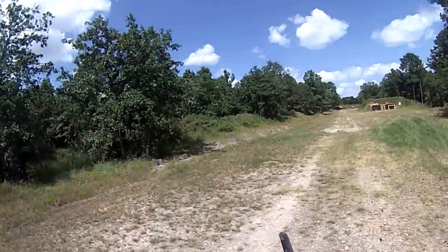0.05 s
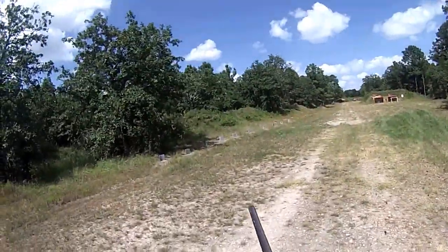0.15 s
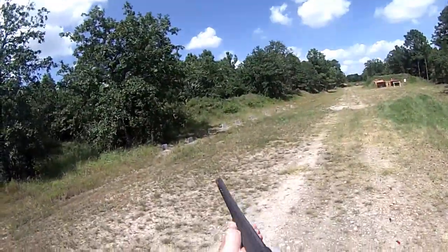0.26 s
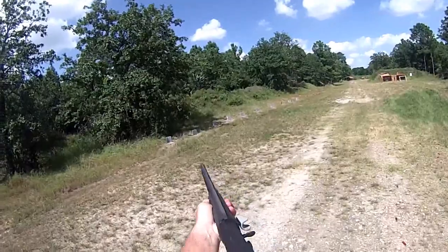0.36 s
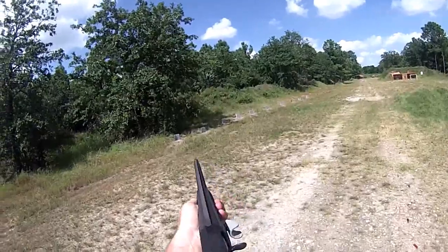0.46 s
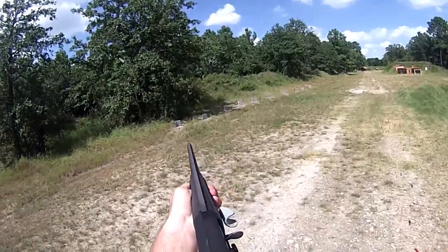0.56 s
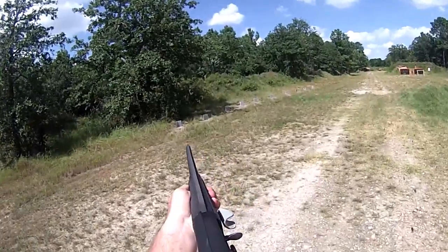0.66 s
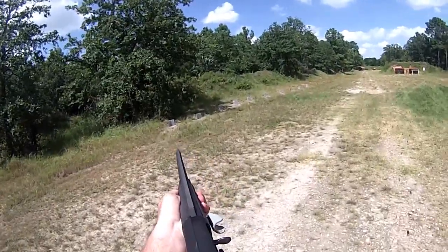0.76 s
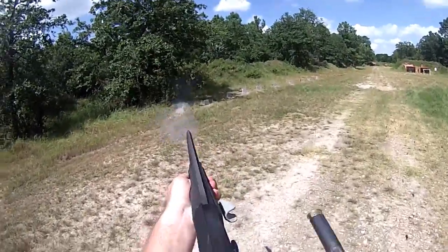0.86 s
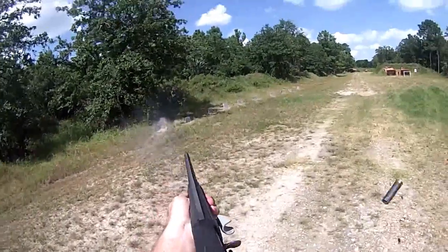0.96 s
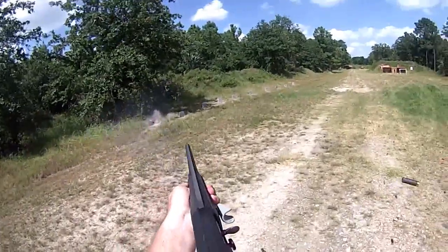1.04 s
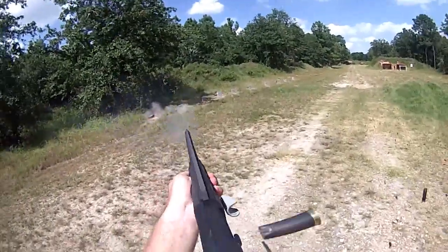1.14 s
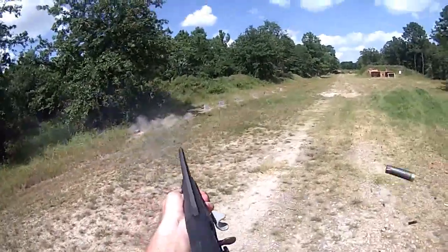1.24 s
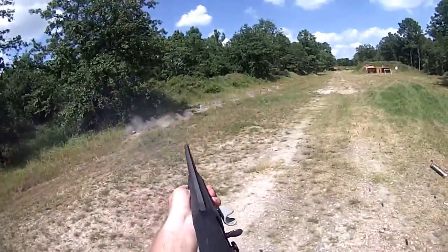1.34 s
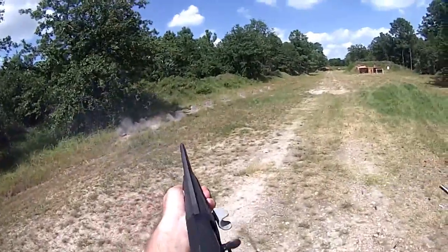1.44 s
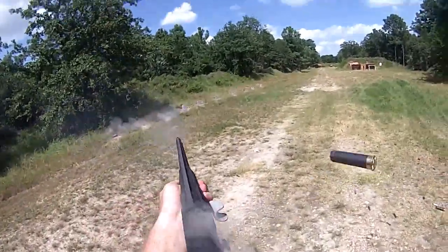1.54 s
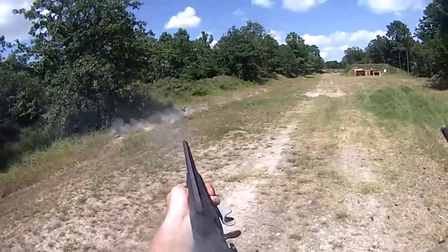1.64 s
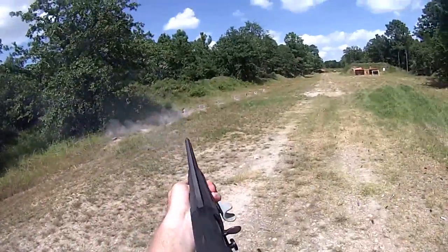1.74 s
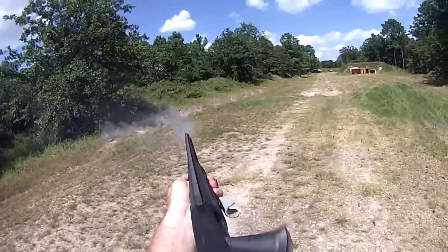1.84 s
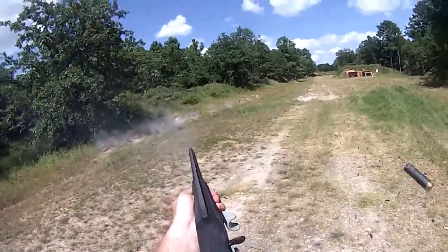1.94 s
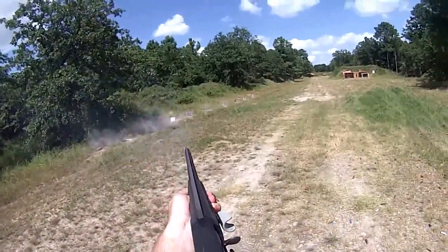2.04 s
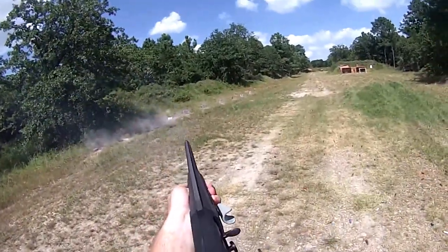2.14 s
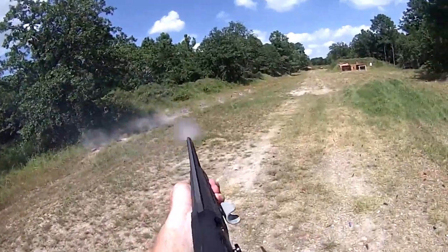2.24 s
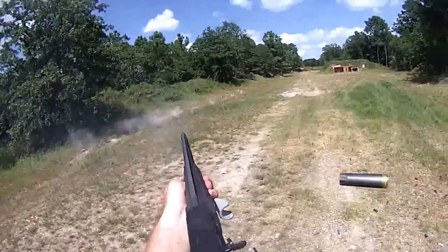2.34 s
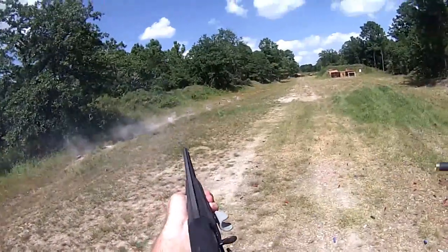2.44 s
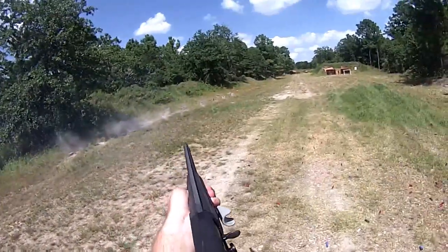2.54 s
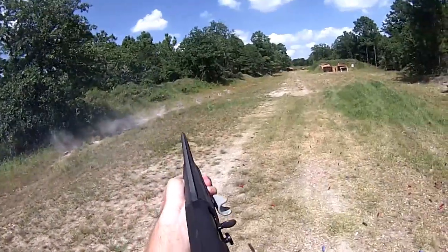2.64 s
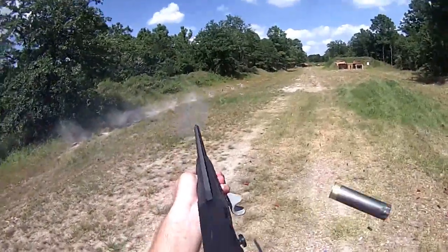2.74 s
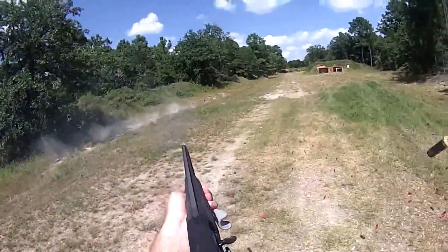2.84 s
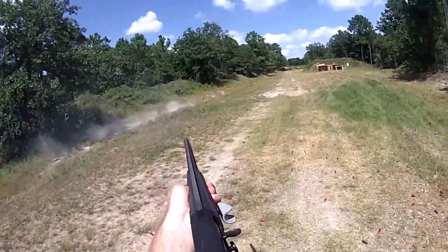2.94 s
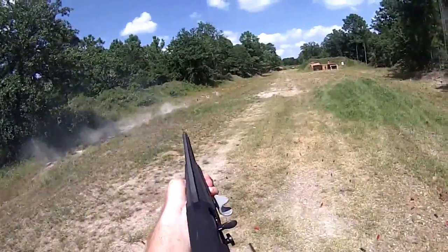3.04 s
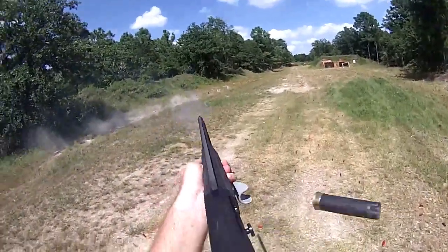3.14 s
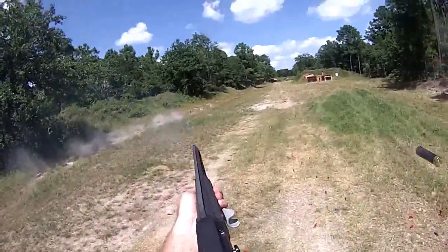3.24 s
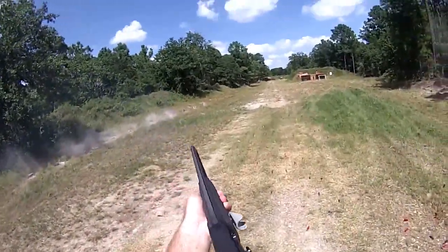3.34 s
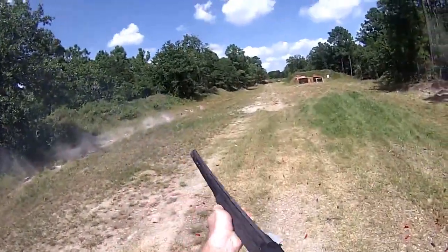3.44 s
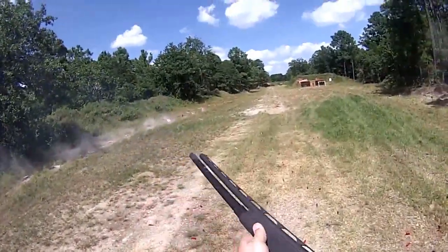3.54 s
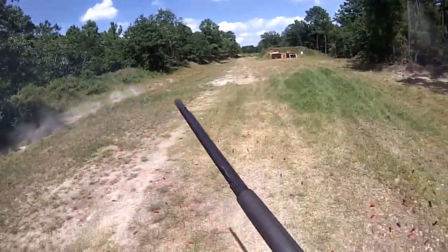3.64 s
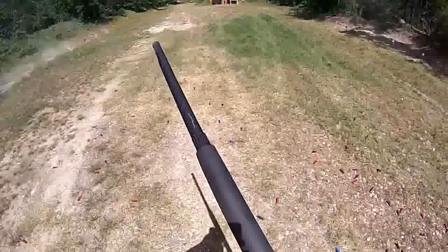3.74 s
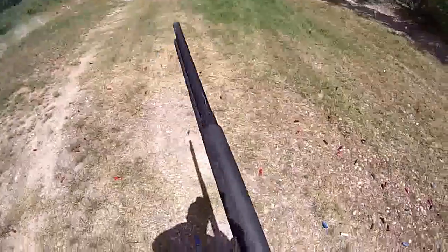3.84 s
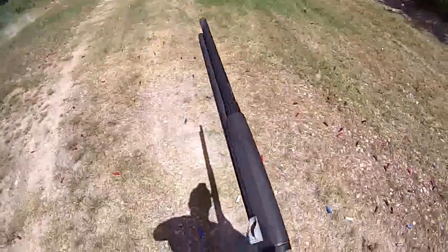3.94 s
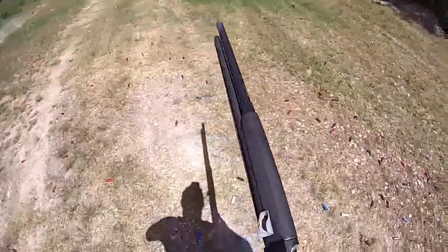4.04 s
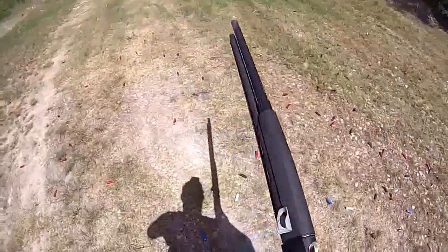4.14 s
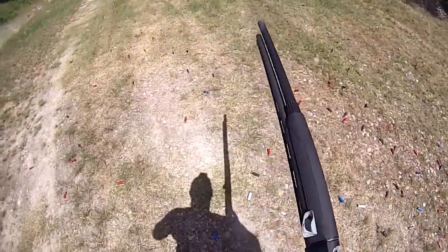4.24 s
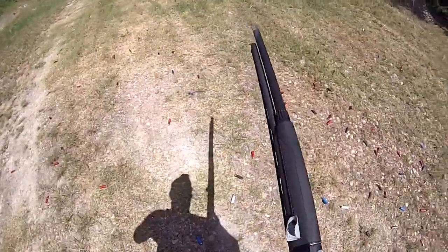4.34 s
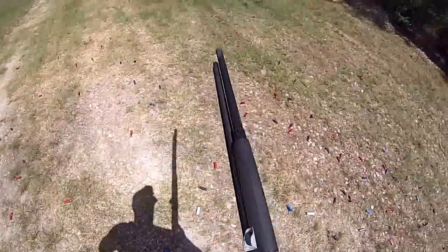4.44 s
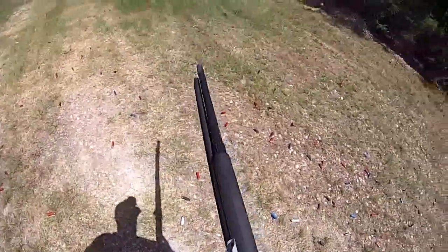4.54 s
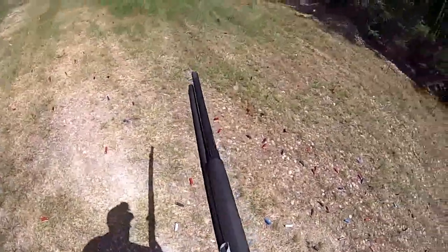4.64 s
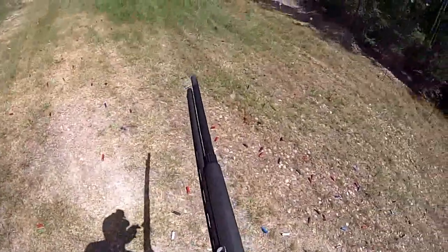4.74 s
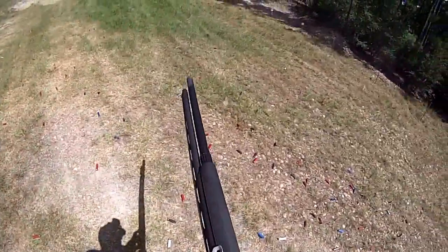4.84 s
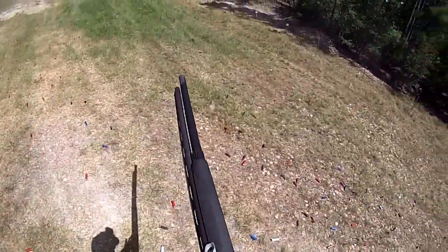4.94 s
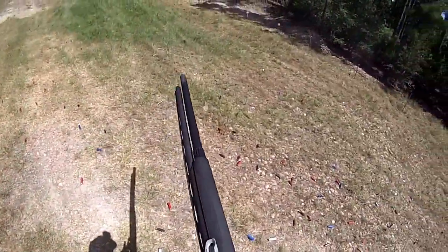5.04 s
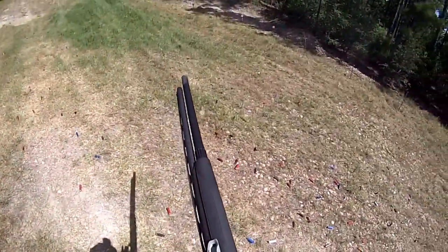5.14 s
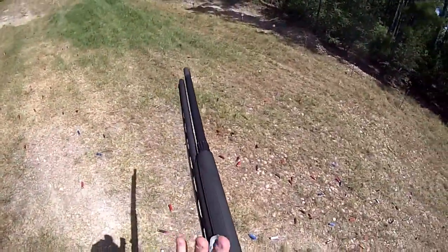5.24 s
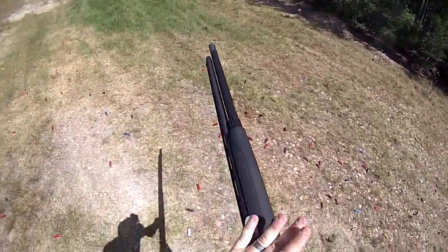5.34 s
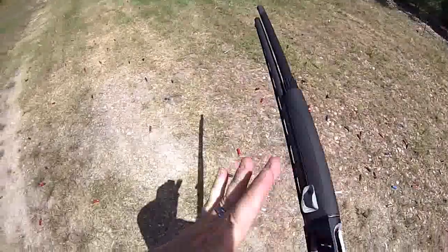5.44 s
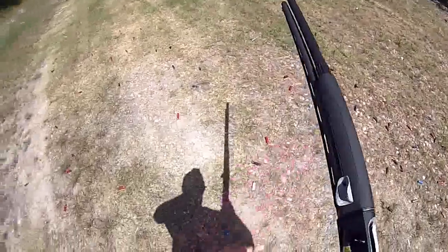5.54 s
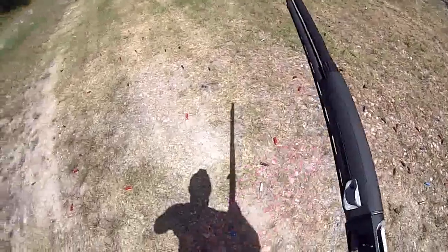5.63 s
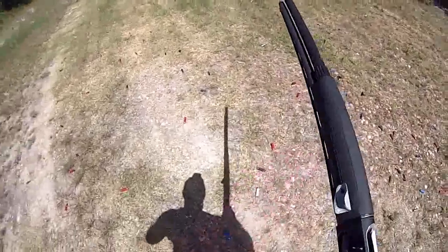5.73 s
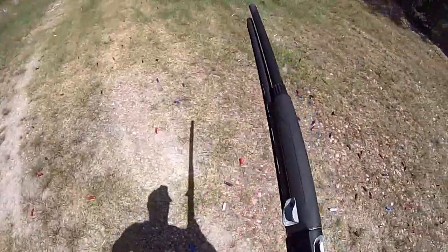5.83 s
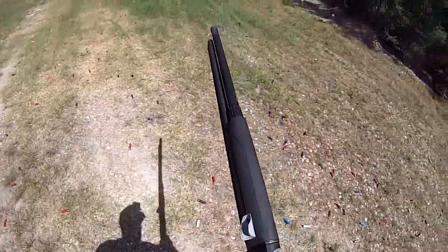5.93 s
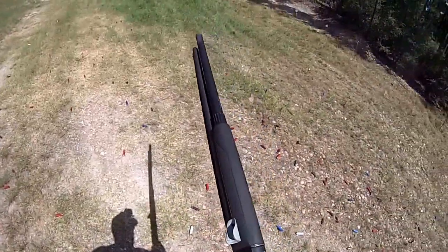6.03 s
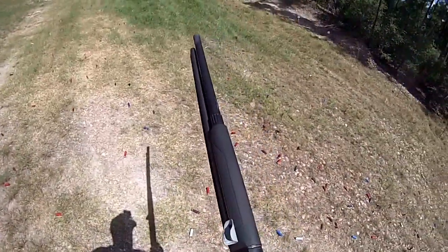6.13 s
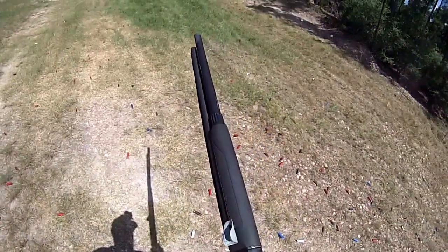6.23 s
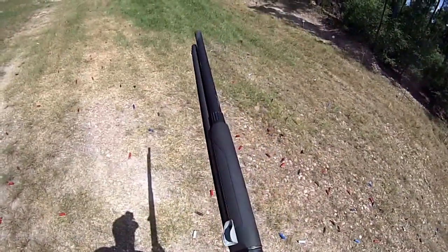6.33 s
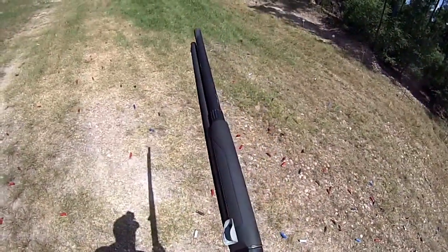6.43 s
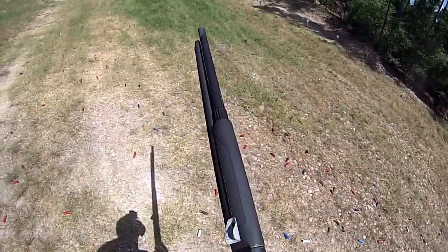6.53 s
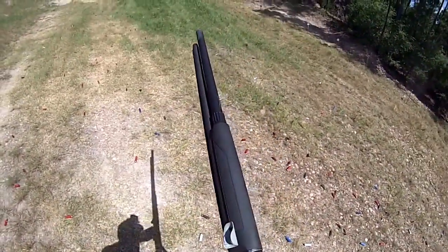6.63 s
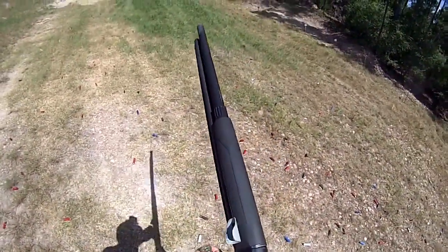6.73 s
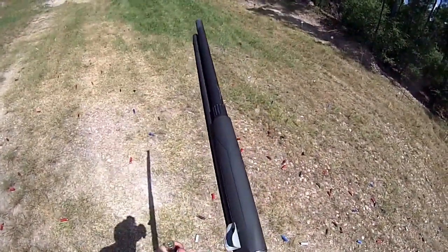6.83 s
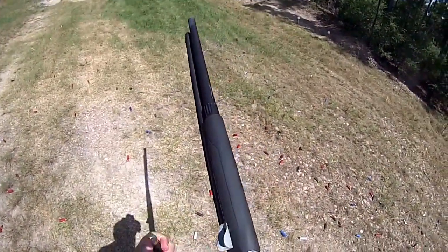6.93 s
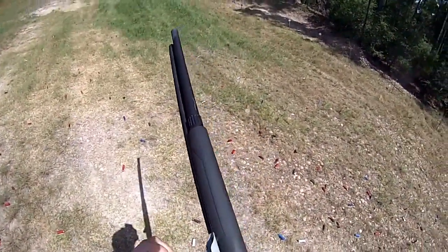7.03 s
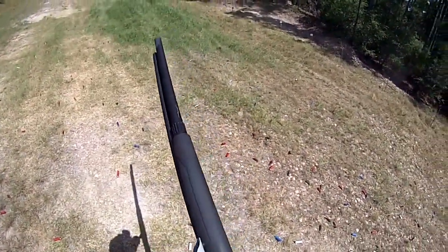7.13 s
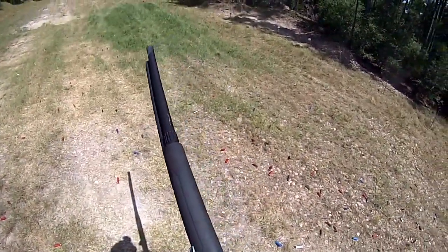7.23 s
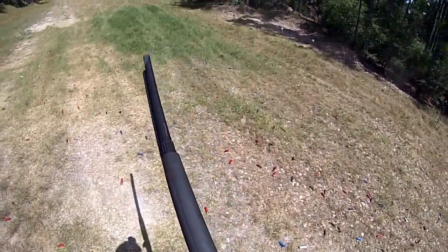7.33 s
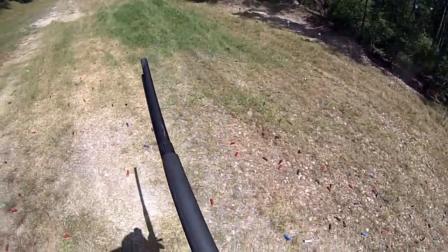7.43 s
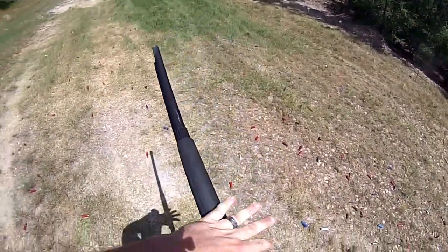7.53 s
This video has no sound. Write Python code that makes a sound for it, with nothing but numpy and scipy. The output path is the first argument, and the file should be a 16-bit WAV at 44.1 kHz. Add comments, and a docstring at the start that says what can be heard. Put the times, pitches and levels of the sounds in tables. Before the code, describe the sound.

A shotgun fires seven quick, loud shots outdoors with rolling echoes, then shells click and scrape as it is reloaded in light wind.

```python
"""A self-loading shotgun fires seven quick shots on an outdoor range, heard from the shooter's camera.
Each blast of shock and hot gas overloads the microphone, rocks the camera, cycles the steel bolt and
rolls back from the tree line. Then the gun is lowered and reloaded: shells click against the port and
scrape into the magazine. A light breeze runs underneath, buffeting harder when the shooter moves."""
import sys
import numpy as np
from scipy import signal
from scipy.fft import rfft, irfft, next_fast_len
from scipy.io import wavfile
from scipy.ndimage import uniform_filter1d, minimum_filter1d, map_coordinates

SR = 44100
rng = np.random.default_rng(int(sys.argv[2]) if len(sys.argv) > 2 else 0)


def persist_wave(psi):
    """Save psi, clipped to +-1, as 16-bit WAV."""
    counts = np.round(np.clip(psi, -1, 1) * 32767).astype(np.int16)
    wavfile.write(sys.argv[1], SR, np.atleast_2d(counts).T)


N = 334278


def amp(db):
    """Decibels to gain."""
    return 10 ** (np.asarray(db) / 20)


def unit(x):
    """x at rms 1."""
    return x / np.sqrt(np.mean(x ** 2) + 1e-20)


def clock(seconds):
    """Sample times of a sound of this length."""
    return np.arange(int(seconds * SR)) / SR


def along(points, hz):
    """Read a curve of (frequency [Hz], value) points on a log frequency axis."""
    freqs, values = np.transpose(points)
    return np.interp(np.log(hz + 1), np.log(freqs + 1), values)


def add(track, s, sound):
    """Mix a sound into the track at s seconds."""
    part = track[max(round(s * SR), 0):][:len(sound)]
    part += sound[:len(part)]


def filtered(x, response):
    """x through a filter, given as a complex response of frequency."""
    size = next_fast_len(len(x) + 8192)
    return irfft(rfft(x, size) * response(np.fft.rfftfreq(size, 1 / SR)), size)[:len(x)]


def lowpass(x, cutoff_hz):
    """A gentle one-pole roll-off."""
    return filtered(x, lambda hz: 1 / (1 + 1j * hz / cutoff_hz))


def resonances(modes, hz, polarity=-1):
    """Response of a resonator bank, signs alternating; polarity 1 leaves notches between the peaks."""
    return sum(polarity ** k * amp(db) * 1j * hz * width / (centre ** 2 - hz ** 2 + 1j * hz * width)
               for k, (centre, width, db) in enumerate(modes))


def noise(spectrum, t):
    """Coloured noise of rms 1 over the times t."""
    return unit(filtered(rng.standard_normal(len(t)), lambda hz: amp(along(spectrum, hz))))


def wobble(rate, t):
    """Smooth random modulation, rate knots a second."""
    return map_coordinates(rng.standard_normal(int(t[-1] * rate) + 2), [t * rate], mode="nearest")


def envelope(t, attack, t60, hold=0):
    """A quick attack, an optional hold and an exponential decay, all in seconds."""
    return (1 - np.exp(-t / attack)) * np.exp(-np.log(1000) * np.maximum(t - hold, 0) / t60)


# Soft bed of outdoor air: (frequency [Hz], level [dB])
AIR_SPECTRUM = [(90, 1.5), (200, -7), (400, -10), (1200, -16.5), (3000, -22.5), (7000, -31.5), (13500, -40),
                (16000, -49)]
# Wind rumble on the microphone: (frequency [Hz], level [dB])
BUFFET_SPECTRUM = [(8.8, -36), (15, -2.5), (32, 2), (50, -2.5), (63, -5.5), (97, -32), (160, -38),
                   (210, -69.5), (350, -120)]
# Wind swells as the gun is raised, fired, lowered and reloaded: (time [s], level [dB], half width [s])
BUFFET_SWELLS = [(.05, -45.5, 0.15), (.53, -29.5, 0.103), (1.05, -34.5, 0.19), (1.85, -35, 0.29),
                 (2.9, -36, 0.31), (3.62, -34.5, 0.18), (5.45, -43, .15), (6.83, -38, 0.041)]
def breeze(buffet_db=3, air_db=-54):
    """Wind buffets the microphone, more when the shooter moves, over a soft, even rush."""
    t = np.arange(N) / SR
    swells = sum(amp(db) * np.exp(-((t - s) / width) ** 2) for s, db, width in BUFFET_SWELLS)
    flow = amp(-52.5) + swells  # some wind remains when the shooter stands still
    buffet = flow * amp(buffet_db + 2.4 * wobble(6.2, t)) * noise(BUFFET_SPECTRUM, t)
    air = amp(air_db + 0.18 * wobble(9, t)) * noise(AIR_SPECTRUM, t)
    return buffet + air


# Low thumps of body movement: (time [s], level [dB])
BODY_BUMPS = [(0.487, -16), (5.369, -18), (6.722, -26), (6.801, -35), (7.513, -30.5)]
def camera_jolts(recoil_db=-5, recoil_hz=35, bump_db=4, bump_hz=40):
    """Recoil and body movements rock the camera on its mount: a few slow swings of pressure."""
    out, t = np.zeros(N), clock(0.5)
    for s, *_ in SHOTS:
        swing = np.sin(2 * np.pi * recoil_hz * t + 0.25 * wobble(35, t))
        add(out, s + 0.001, amp(recoil_db) * swing * envelope(t, 0.0088, 0.39))
    for s, db in BODY_BUMPS:
        swing = np.sin(2 * np.pi * bump_hz * t + 0.5 * wobble(50, t))
        add(out, s, amp(db + bump_db) * swing * envelope(t, 0.0085, 0.32))
    return out


# Metallic colour of the receiver, for scrapes and clicks: (frequency [Hz], width [Hz], level [dB])
RECEIVER_MODES = [(1450, 180, 2.5), (2265, 260, 3), (2964, 157, 5.5), (3480, 102, 5), (3960, 270, 2.5),
                  (4930, 190, -5.5), (5620, 440, -7.5), (8760, 1110, -12.5), (12100, 1000, -27.5)]
# Shells sliding into the magazine: (time [s], length [s], start level [dB], end level [dB])
SHELL_SLIDES = [(5.357, 0.064, -31, -30.5), (6.719, 0.037, -37.5, -26), (6.776, 0.017, -13, -18),
                (6.831, 0.033, -36, -40.5), (7.441, 0.15, -51, -26.5)]
def shell_scrapes(slide_db=-8, grain_db=3.5, chatter_db=3, bright_hz=5000):
    """Each shell sticks and slips along the port as it is pushed in."""
    out, t = np.zeros(N), clock(0.4)
    for s, length, start_db, end_db in SHELL_SLIDES:
        slips = rng.standard_normal(len(t))
        slips *= amp(grain_db * wobble(456.4, t) + chatter_db * wobble(158, t))
        scrape = unit(filtered(slips, lambda hz: resonances(RECEIVER_MODES, hz) * (1 + hz / bright_hz)))
        push = amp(slide_db + np.interp(t, [0, length], [start_db, end_db]))
        add(out, s, scrape * push * envelope(t, 0.00067, 0.084, hold=length))
    return out


# Short ring of the magazine tube: (frequency [Hz], level [dB], t60 [s])
TUBE_MODES = [(2277, -10, .04), (2896, -7, .04), (3650, -8, .03), (4100, -5, .035), (4350, 0, .05)]
# Shells and fingers hitting the loading port:
# (time [s], level [dB], knock [dB], ring [dB], tilt [dB/octave], favoured frequency [Hz])
PORT_HITS = [(3.8586, -33, -21, -15, 6, 1450), (4.8927, -23.5, -22, -20, 0, 2360),
             (4.946, -39.5, -12, -31, 11, 1190), (5.0739, -39.5, -12, -18, -3, 4130),
             (5.1001, -16.5, -28, -7, -1.5, 3900), (5.1607, -34, -32, -1.5, 1.5, 4130),
             (5.2086, -41.5, -22, -18, -1, 2220), (5.3576, -8.5, -21, -20, 5, 4160),
             (5.412, -15, -3.5, -17.5, 5, 1450), (5.9668, -45.5, -8, -27, -7.5, 1535),
             (6.1552, -37, -2, -31, -4.5, 1210), (6.6926, -37, -17, -27, 6, 1490),
             (6.7305, -18, -16, -18, 6, 5660), (6.7673, -15.5, -12, -14, 1, 4100),
             (6.7743, -4, -19, -37, 5.5, 1980), (7.2914, -20.5, -16.5, -27, 6.5, 2720),
             (7.3097, -30, -14, -22, 3, 1657), (7.426, -30, -25, -27, 3, 4100),
             (7.5015, -20.5, -11, -34, 10, 3670), (7.524, -18, -15, -25, -0.5, 3450),
             (7.5695, -9, -28, -35, 4.5, 3370)]
def loading_clicks(snap_db=-4, knock_db=-8, crack_db=-26, rebound_s=0.011, rebound_db=-15):
    """Shells tap the port with a dry crack and a dull knock, rebound and ring the magazine tube."""
    out, t = np.zeros(N), clock(0.19)
    knock_spectrum = [(200, -15), (620, 5.5), (1350, 13), (2200, -50), (6000, -60)]
    for s, db, dull_db, ring_db, tilt_db, spot_hz in PORT_HITS:
        def colour(hz):
            """The receiver's tone, with one resonance favoured by the spot that is struck."""
            spot = 1.5 + resonances([(spot_hz, 450, 7)], hz)
            tilt = amp(tilt_db * np.log2((hz + 500) / 4500))
            return resonances(RECEIVER_MODES, hz) * spot * tilt

        for delay, loss_db in [(0, 0), (rebound_s, rebound_db)]:
            contact = rng.standard_normal(len(t)) * envelope(t, 0.0003, 0.025)
            snap = amp(snap_db) * filtered(contact, colour)
            knock = amp(knock_db + dull_db) * noise(knock_spectrum, t) * envelope(t, 0.0033, 0.061)
            ring = sum(amp(mode_db + rng.normal(0, 4.4)) * np.sin(2 * np.pi * hz * t)
                       * envelope(t, 0.00013, t60) for hz, mode_db, t60 in TUBE_MODES)
            click = snap + amp(crack_db) * contact + knock + amp(ring_db) * ring
            add(out, s + delay, amp(db + loss_db) * click)
    return out


# Reverb time of the woods: (frequency [Hz], t60 [s])
WOODS_DECAY = [(200, 1.8), (700, 1.4), (1600, 1.5), (3500, 1.1), (5500, 0.87), (12000, 0.27)]
def woods_tail(woods):
    """Shape noise into the roll of distant woods: it comes in clumps, the treble dying first."""
    hz, age, bands = signal.stft(woods, SR, nperseg=256)
    clumps = uniform_filter1d(rng.standard_normal(bands.shape), size=11, axis=0)  # across frequency
    clumps = unit(uniform_filter1d(clumps, size=2, axis=1))  # across time
    clump_db = clumps * along([(1500, 4), (5000, 1.2)], hz)[:, None]
    decay_db = -60 * (age - 0.25) / along(WOODS_DECAY, hz)[:, None]
    return signal.istft(bands * amp(decay_db + clump_db), SR, nperseg=256)[1][:len(woods)]


# Bright scatter from the ground and the nearest trees: (frequency [Hz], level [dB])
NEAR_SPECTRUM = [(110, -34.5), (180, -10), (293, -16), (888, -9.5), (1500, -2.5), (2030, -7.5), (2230, -2),
                 (2450, -8.5), (3560, -1), (5280, -13), (5800, -14), (7690, -16.5), (11400, -23),
                 (14800, -33.5), (16000, -52.5)]
# Darker wash from the woods behind: (frequency [Hz], level [dB])
WOODS_SPECTRUM = [(120, -46.5), (200, -7.5), (422, -15.5), (694, -1), (1230, -5.5), (1520, 1.5), (2050, -4),
                  (2240, -1), (2500, -13), (2830, -3), (3630, -4.5), (5270, -18.5), (5760, -18),
                  (6500, -14.5), (7100, -23), (8980, -24), (14000, -45.5)]
# Slapbacks from the edges of the range: (delay [s], level [dB], t60 [s])
SLAPBACKS = [(.178, -15, 0.037), (.213, -24.5, .05), (.275, -33.5, .06), (.88, -49.5, .25),
             (1.083, -46.5, .05)]
def range_echoes(near_db=-19.5, far_db=-29, patchy_db=2, ground_s=0.0026, trees_s=0.046, build_s=0.27):
    """Ground and nearby trees throw back a bright rush, the edges slap back and the woods roll on."""
    out, t = np.zeros(N), clock(2.2)
    trunks = amp(patchy_db * wobble(130, t))  # the same trees answer every shot
    ground = amp(2) * envelope(np.maximum(t - ground_s, 0), 0.0014, 0.24)
    trees = amp(-5.5) * envelope(np.maximum(t - trees_s, 0), 0.0042, 0.33, hold=0.078)
    build_up = 1 - np.exp(-(t / build_s) ** 2)
    for s, *_ in SHOTS:
        near = amp(near_db) * noise(NEAR_SPECTRUM, t) * np.hypot(ground, trees) * trunks
        woods = noise(WOODS_SPECTRUM, t)
        far = amp(far_db) * woods_tail(woods) * build_up
        add(out, s, near + far)
        for delay, db, t60 in SLAPBACKS:
            add(out, s + delay, amp(db) * woods * envelope(t, 0.002, t60))
    return out


# Steel-on-steel clack: (frequency [Hz], level [dB])
CLACK_SPECTRUM = [(180, -33), (300, -3.5), (528, -9), (961, -14.5), (1510, -8), (2610, -11), (3580, 0),
                  (4990, -15), (5800, -10), (6960, -15), (11300, -19.5), (14200, -29.5), (16000, -46.5)]
# High ring of the bolt: (frequency [Hz], level [dB], t60 [s])
BOLT_MODES = [(6950, -2, .16), (10000, 1, .15)]
# Ping of the ejected hull: (frequency [Hz], level [dB], t60 [s])
HULL_MODES = [(4231, 0, .21), (4950, -14, .17)]
# The bolt slamming home on a fresh shell: (time [s], level [dB])
BOLT_SLAMS = [(0.989, -23), (1.294, -26), (1.648, -26), (2.007, -26), (2.4342, -24.5), (2.871, -24.5)]
# Light ticks of the trigger: (time [s], level [dB])
TRIGGER_TICKS = [(2.265, -29), (2.9946, -29.5), (3.448, -40)]
def gun_action(bolt_db=12, ring_db=15, ring_rise_s=0.037, unlock_s=0.0263, eject_s=0.016,
               low_cut_hz=450, body_hz=1510, body_db=-11):
    """The bolt unlocks, hits its stop, ejects a ringing hull and, on all but the last shot, slams home."""
    out, t = np.zeros(N), clock(0.4)

    def tone(hz):
        """One partial with a slight waver in its phase."""
        return np.sin(2 * np.pi * hz * t + 0.25 * wobble(250, t))

    def clack(db, t60):
        """Steel strikes steel: a noise burst with its lows thinned."""
        steel = filtered(noise(CLACK_SPECTRUM, t), lambda hz: hz ** 2 / (hz ** 2 + low_cut_hz ** 2))
        return amp(db + bolt_db) * steel * envelope(t, 0.00018, t60)

    def heavy_clack(db, t60):
        """A harder blow also rings the receiver."""
        return clack(db, t60) + amp(db + bolt_db + body_db) * tone(body_hz) * envelope(t, 0.001, 0.11)

    def ring(modes):
        """Ringing partials that bloom and die away."""
        bloom = amp(ring_db) * (1 - np.exp(-(t / ring_rise_s) ** 2))
        return bloom * sum(amp(db - 60 * t / t60) * tone(hz) for hz, db, t60 in modes)

    for s, _, _, travel, stop_db, hull_db, steel_db in SHOTS:
        add(out, s + unlock_s, heavy_clack(db=-21, t60=0.02))
        add(out, s + travel, heavy_clack(stop_db, t60=0.033) + amp(steel_db) * ring(BOLT_MODES))
        add(out, s + travel + eject_s, amp(hull_db) * ring(HULL_MODES))
    for s, db in BOLT_SLAMS:
        add(out, s, clack(db, t60=0.04))
    for s, db in TRIGGER_TICKS:
        add(out, s, clack(db, t60=0.014))
    return out


# Crack of the cartridge firing inside the gun: (frequency [Hz], level [dB])
IGNITION_SPECTRUM = [(100, -22.5), (700, -7), (1150, -12.5), (1900, -11), (2450, -1), (3300, 3.5),
                     (5000, -7.5), (7000, -12), (8500, -11.5), (10500, -23), (14000, -25.5), (16000, -41)]
# Resonances of the camera housing under a blast: (frequency [Hz], width [Hz], level [dB])
HOUSING_MODES = [(76, 62, -12), (309.5, 1200, -15), (846, 650, -4.5), (1478, 390, 3.5), (1837, 420, -8),
                 (2175, 160, -1), (2980, 140, -11), (3450, 380, -2), (4130, 110, -2.5), (4500, 450, -1.5),
                 (4890, 150, -4), (5690, 1400, -6.5), (6700, 1400, -22)]
# Cue list of the shots, which also drives the action, echoes and recoil:
# (time [s], blast [dB], punch [dB], bolt travel [s], stop clack [dB], hull ping [dB], bolt ring [dB])
SHOTS = [(.8678, 2, 1.5, 0.049, -12, -13.5, -40), (1.161, 0, -17, 0.05, -16, -26.5, -55),
         (1.518, -0.5, -11.5, 0.058, -21, -47, -38), (1.888, 1, 4, 0.063, -20, -48, -52),
         (2.3107, -.5, -21, .0693, -22.5, -50, -41), (2.7468, -1, -22.5, .0757, -23.5, -56, -30.5),
         (3.157, 1, -20.5, 0.093, -36, -52, -55)]
def muzzle_blasts(shock_db=50, gas_db=22, punch_db=9, punch_hz=210, ignition_db=-3, lead_s=0.0046,
                  bounce_s=0.007, bounce_db=-21, bounce_hz=3200):
    """The cartridge fires inside the gun; shock and hot gas leave the muzzle and bounce off the ground."""
    out, t = np.zeros(N), clock(0.077)
    impulse = 1.0 * (t == 0)
    shock = amp(shock_db) * lowpass(lowpass(impulse, 4800), 7000)
    for s, db, low_db, *_ in SHOTS:
        gas = amp(gas_db) * lowpass(rng.standard_normal(len(t)) * envelope(t, 0.0001, 0.012), 5500)
        crack = amp(db) * filtered(shock + gas, lambda hz: resonances(HOUSING_MODES, hz, polarity=1))
        # the ball of gas swells and falls back
        punch = amp(punch_db + low_db) * np.sin(2 * np.pi * punch_hz * t) * envelope(t, 0.0015, 0.013)
        blast = crack + punch
        ignition = amp(ignition_db) * noise(IGNITION_SPECTRUM, t) * envelope(t, 0.0006, 0.045)
        add(out, s - lead_s, ignition)
        add(out, s, blast)
        add(out, s + bounce_s, amp(bounce_db) * lowpass(lowpass(blast, bounce_hz), bounce_hz))
    return out


def scene():
    """The mono mix of everything that reaches the microphone."""
    gunfire = muzzle_blasts() + range_echoes() + gun_action()
    return (gunfire + camera_jolts() + loading_clicks() + shell_scrapes() + breeze())[None]


def record(dry, duck_db=-14, hold_s=0.48, recovery_per_s=1.0, slew_hz=8000, top_hz=15300):
    """Overload ducks the gain, which creeps back; the blasts still saturate, steepest edges first."""
    x, t = dry[0], np.arange(N) / SR
    needed_gain = np.where(np.abs(x) > 2, amp(duck_db), 1)
    lookahead, width = int(0.006 * SR), int(hold_s * SR)
    held_gain = np.roll(minimum_filter1d(needed_gain, width), width // 2 - lookahead)
    release = recovery_per_s * t
    gain = np.minimum.accumulate(held_gain - release) + release
    # treble is boosted into the saturation and rolled off after it
    boosted = filtered(x * gain, lambda hz: (1 + 1j * hz / slew_hz) * (hz < 20000))
    saturated = boosted / (1 + np.abs(boosted / 0.99) ** 6) ** (1 / 6)
    rounded = lowpass(saturated, slew_hz)
    return filtered(rounded, lambda hz: 1 / np.sqrt(1 + (hz / top_hz) ** 120))[None]  # steep high cut


dry = scene()
out = record(dry)
persist_wave(out)
```